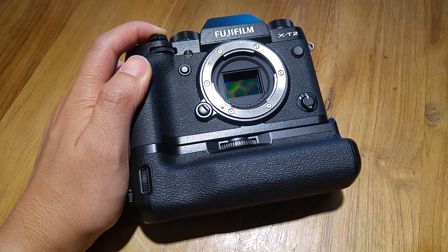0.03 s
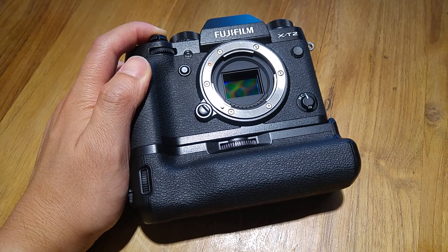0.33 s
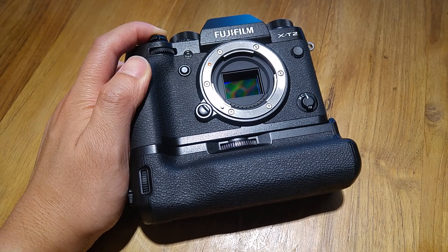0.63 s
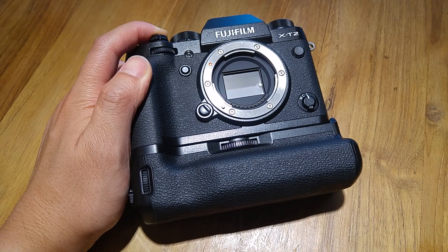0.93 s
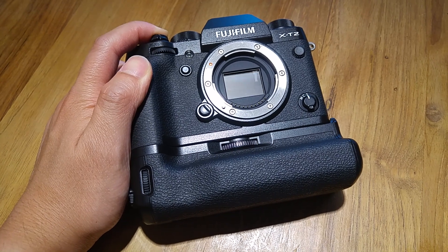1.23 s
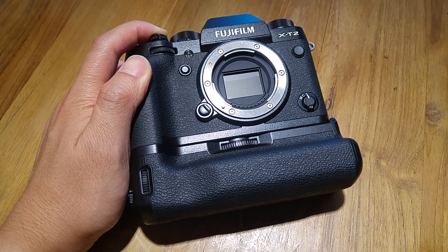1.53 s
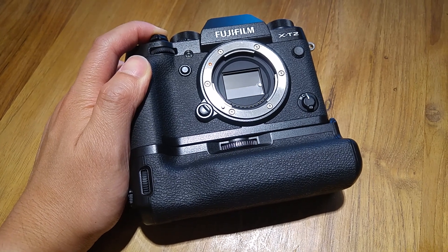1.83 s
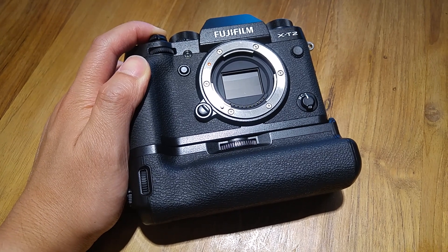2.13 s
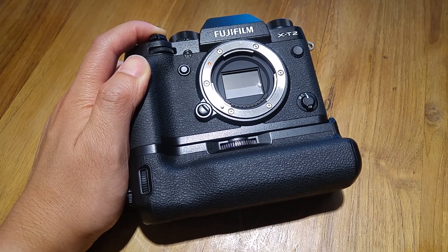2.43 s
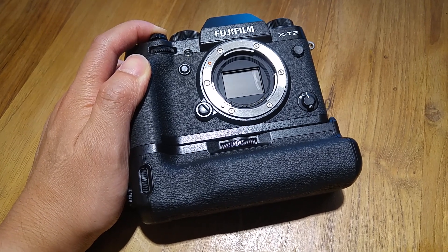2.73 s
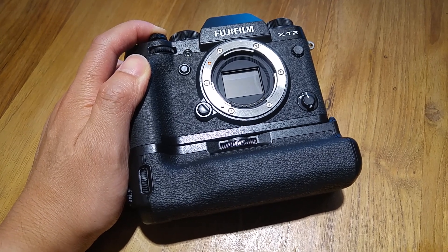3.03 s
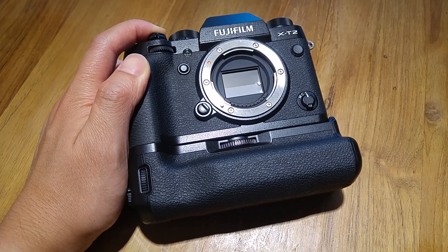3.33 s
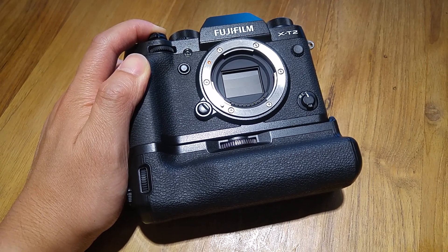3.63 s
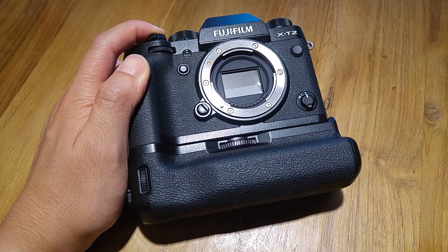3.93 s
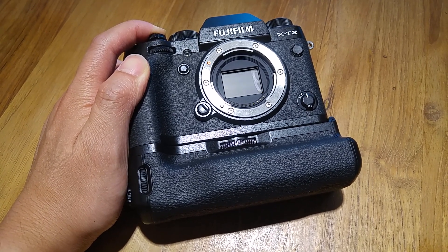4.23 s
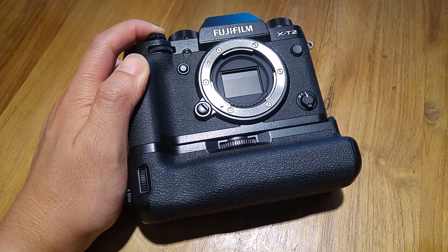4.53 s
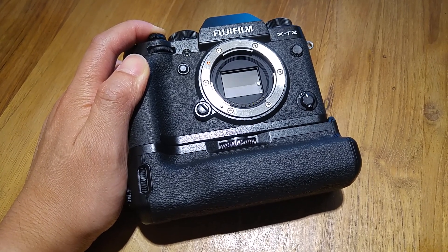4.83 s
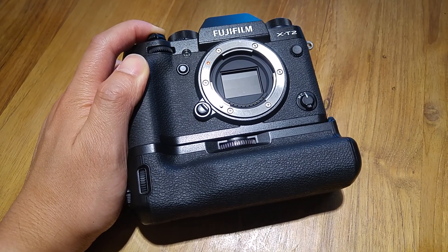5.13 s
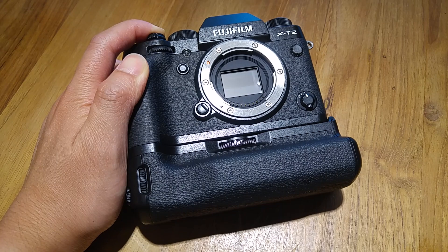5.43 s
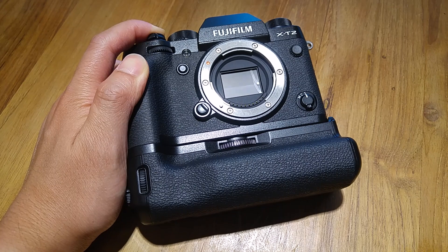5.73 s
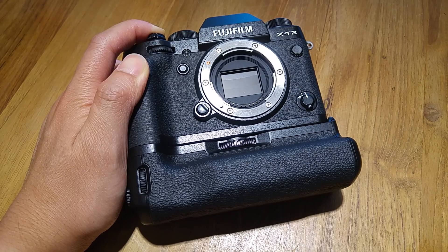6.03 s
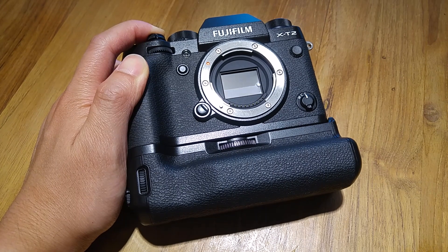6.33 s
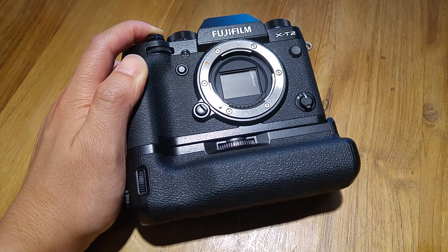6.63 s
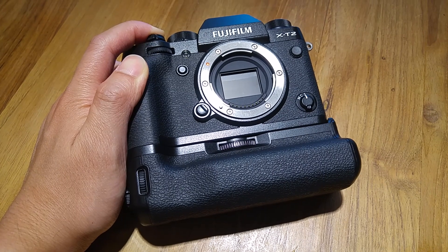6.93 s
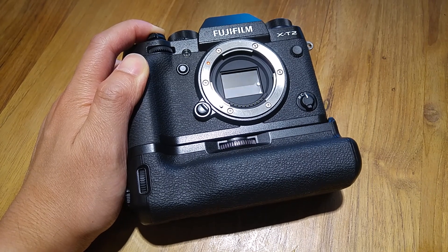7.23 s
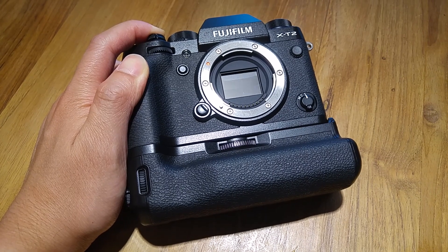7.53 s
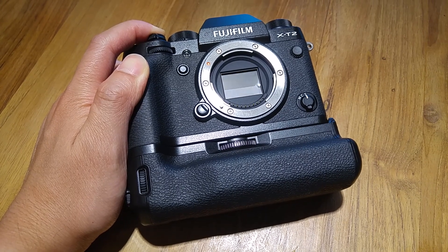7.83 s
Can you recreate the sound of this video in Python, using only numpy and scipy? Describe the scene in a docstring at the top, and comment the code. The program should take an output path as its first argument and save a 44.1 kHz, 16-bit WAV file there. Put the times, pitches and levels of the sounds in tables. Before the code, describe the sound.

A camera held on a wooden table fires continuously, heard close up in stereo in a small room. A short silence and a faint button tick come first, then bright mechanical shutter clicks follow one another in a fast, regular clatter that lasts to the end. Each shot carries tiny latch snaps and a faint rasp of the motor, while soft room reflections and a low table rumble fill the gaps.

```python
"""Camera shutter burst on a wooden table

A mirrorless camera, held on a table in a small room, fires about eleven frames a second close to a stereo
microphone. Each frame repeats one sequence of blows (curtain, latches, levers) and a short run of the
cocking motor. The blows ring the blades, the body and the table; the room fills the gaps."""
import sys
import numpy as np
from scipy import signal
from scipy.fft import rfft, irfft
from scipy.io import wavfile

SR = 44100
rng = np.random.default_rng(int(sys.argv[2]) if len(sys.argv) > 2 else 0)


def wrap_up_sound(samples):
    """Save the sound to the file named by the first command line argument, as 16-bit audio."""
    columns = np.atleast_2d(samples).T
    # keep every value between -1 and 1, then stretch to whole-number steps
    tamed = np.clip(columns, -1, 1)
    steps = np.round(tamed * 32767).astype(np.int16)
    wavfile.write(sys.argv[1], SR, steps)


N = 348390
LEFT_LEAD_S = 0.00011  # the camera's sound reaches the left capsule first
FILTER_HZ = np.fft.rfftfreq(4096, 1 / SR)


def gain_of(db):
    """Decibels to amplitude."""
    return 10 ** (np.asarray(db) / 20)


def unit(x):
    """Scales each row to an energy of 1."""
    return x / np.sqrt(np.sum(x ** 2, -1, keepdims=True) + 1e-20)


def curve_at(points, hz):
    """Reads a curve on a log-frequency axis."""
    point_hz, value = np.transpose(points)
    return np.interp(np.log(hz + 1), np.log(point_hz), value)


def add(mix, start_s, sound):
    """Mixes a stereo sound in at its start time."""
    part = mix[:, max(round(start_s * SR), 0):][:, :sound.shape[-1]]
    part += sound[..., :part.shape[-1]]


def minimum_phase(db):
    """The causal stereo response, of mean energy 1, of spectra given on FILTER_HZ."""
    log_gain = np.log(gain_of(np.concatenate([db, db[..., -2:0:-1]], -1)))
    taps = np.fft.ifft(np.exp(np.conj(signal.hilbert(log_gain)))).real[..., :1024]
    return taps / np.sqrt(np.mean(np.sum(taps ** 2, -1)))


def diffuse_field(samples, alike_hz=900):
    """Noise spectra at two close capsules: alike in the bass, unrelated in the treble."""
    left, other = rfft(rng.standard_normal((2, samples)))
    hz = np.fft.rfftfreq(samples, 1 / SR)
    coherence = 1 / (1 + (hz / alike_hz) ** 2)
    return hz, np.array([left, coherence * left + np.sqrt(1 - coherence ** 2) * other])


def wash(spectrum, level):
    """Noise from all around the microphone, with a given spectrum and level curve."""
    hz, field = diffuse_field(N)
    noise = unit(irfft(field * gain_of(curve_at(spectrum, hz)), N)) * np.sqrt(N)
    return noise * gain_of(np.interp(np.arange(N) / SR, *np.transpose(level)))


# The air of the small room. Each row: frequency in Hz, relative level in dB.
AIR_SPECTRUM = [(18, -46), (30, -20), (167, -4), (240, -3.5), (404, -5), (538, -15), (629, -5.5),
                (1200, -16), (1370, -24), (1690, -21.5), (5300, -33), (7240, -28), (15000, -52)]
# The fade-in of the sound. Each row: time in seconds, level in dB.
AIR_FADE = [(.567, -140), (.570, -60), (.62, -54), (.69, -48.5), (.78, -45)]

def room_tone():
    """Faint background air; the sound fades in from silence just ahead of the shutter button."""
    return wash(AIR_SPECTRUM, AIR_FADE)


# The table top under the camera. Each row: frequency in Hz, relative level in dB.
RUMBLE_SPECTRUM = [(25, -18), (40, -13), (60, -0.5), (88, -15), (118, -2), (180, -2.5), (250, -3.5),
                   (340, -5), (450, -5), (540, -16), (640, -5.5), (1100, -10), (2000, -19), (5000, -60)]
# Its build-up with the first frames. Each row: time in seconds, level in dB.
RUMBLE_SWELL = [(.6, -140), (.8, -64), (.86, -39), (7.9, -39)]

def table_rumble():
    """The shaking table top rumbles for as long as the burst runs."""
    return wash(RUMBLE_SPECTRUM, RUMBLE_SWELL)


# The room's decay. Each row: frequency in Hz, time to fall 60 dB in seconds.
ROOM_DECAY = [(100, 0.4), (800, 0.7), (4000, 0.77), (8000, 0.1), (15000, 0.3)]
# The room from close to the camera. Each row: frequency in Hz, level against the direct sound in dB.
ROOM_LEVEL = [(60, -2), (200, -10), (400, -5), (540, -4.5), (800, -13), (1200, -5), (2000, -8.5),
              (3200, -5.5), (4500, -9), (6000, -10.5), (10000, -9.5), (15000, -18)]

def room_tail(nearest_wall_s=.006):
    """Dense reflections that start after the nearest wall and die fastest in the high treble."""
    _, field = diffuse_field(SR // 2)
    hz, t, bands = signal.stft(irfft(field), SR, nperseg=256)
    t60 = curve_at(ROOM_DECAY, hz)[:, None]
    bands = bands * gain_of(curve_at(ROOM_LEVEL, hz)[:, None] - 60 * t / t60)
    bands *= np.sqrt(2 * np.log(1000) / (t60 * SR))  # a longer decay adds no energy
    tail = np.zeros((2, SR // 2))
    add(tail, nearest_wall_s, signal.istft(bands, SR, nperseg=256)[1])
    return tail


def room_reflections(direct, blend_hz=4.3, tails=3):
    """The room's echo blends among several tails, so repeated clicks ring without a fixed pitch."""
    blend_phase = 2 * np.pi * blend_hz * np.arange(N) / SR
    out = np.zeros((2, N))
    for k in range(tails):
        share = np.abs(np.cos(blend_phase + np.pi * k / tails)) * np.sqrt(2 / tails)
        out += signal.oaconvolve(direct * share, room_tail(), axes=1)[:, :N]
    return out


# The thin metal shutter blades, heard close up. Each row: frequency in Hz, relative level in dB.
BLADE_COLOUR = [(300, -34), (1500, -18.5), (3000, -14.5), (3650, -12), (4300, -9), (5200, -0.5), (6300, -1),
                (7400, -2.5), (9300, -3.5), (10500, -5), (11400, -10.5), (13000, -9.5), (15800, -13.5)]
# Their resonances and notches. Each row: centre in Hz, width in Hz, height in dB.
BLADE_RESONANCES = [(4483, 80, 6.5), (5640, 120, 3), (5987, 190, 5.5), (7100, 80, -2), (7535, 68, 5.5),
                    (7840, 160, -4), (8260, 160, 5.5), (9140, 170, 5.5), (12300, 150, 8), (13300, 150, 1),
                    (14300, 300, 2.5)]
# Their image at the microphone. Each row: frequency in Hz, left over right in dB.
BLADE_IMAGE = [(1500, -3.5), (2800, -10), (4500, -6), (6000, -2), (7500, 2.5), (9800, -2), (12000, 3.5),
               (15000, 4)]

def blade_ring(pitch_hz, tilt_db, bump_db=4, bump_octaves=0.17):
    """The blades' response; the place that is struck favours one region of pitch."""
    octaves = np.log2((FILTER_HZ + 1) / pitch_hz)
    db = curve_at(BLADE_COLOUR, FILTER_HZ) + tilt_db * np.maximum(octaves, -1)
    db += bump_db * np.exp(-(octaves / bump_octaves) ** 2)
    for hz, width, height in BLADE_RESONANCES:
        db += height / (1 + (2 * (FILTER_HZ - hz) / width) ** 2)
    return minimum_phase(db + np.array([[.5], [-.5]]) * curve_at(BLADE_IMAGE, FILTER_HZ))


# One run of the motor inside the camera. Each row: time from the curtain's stop in seconds,
# mean pitch in Hz, whine level in dB, gear rasp level in dB.
MOTOR_RUN = [(.011, 948, -58, -50), (.017, 903, -41, -37), (.021, 842, -31.5, -22.5),
             (.026, 747, -28.5, -39), (.030, 696, -42, -41.5), (.037, 671, -39.5, -30.5),
             (.055, 681.6, -51, -32.5), (.068, 679, -45, -30.5), (.082, 674, -46, -39)]

def cocking_motor(frames, pitch_spread=0.0208):
    """The motor's whine sags as it loads the springs; its gears rasp against the blades."""
    times, *columns = np.transpose(MOTOR_RUN)
    t = np.arange(times[0], times[-1], 1 / SR)
    hz, whine_db, rasp_db = (np.interp(t, times, column) for column in columns)
    whine, rasp = np.zeros((2, 2, N))
    for frame_s, _ in frames:
        speed = 1 + pitch_spread * rng.standard_normal()
        cycles = np.cumsum(hz * speed) / SR - hz * np.array([[0], [LEFT_LEAD_S]])
        add(whine, frame_s + times[0], gain_of(whine_db) * np.sqrt(2) * np.sin(2 * np.pi * cycles))
        add(rasp, frame_s + times[0], gain_of(rasp_db) * rng.standard_normal((2, len(t))))
    return whine + signal.oaconvolve(rasp, blade_ring(pitch_hz=7200, tilt_db=-0.5), axes=1)[:, :N]


# The modes of the wooden table and of the camera's heavier parts. Each row: frequency in Hz,
# time to fall 60 dB in seconds, relative level within the part in dB, left over right in dB.
TABLE_MODES = [(62, 0.14, -8.5, 3), (119.3, 0.11, -0.5, 1), (170, .05, -7, 0), (235, 0.042, 1, 0),
               (350, 0.019, -8.5, 8)]
SHELL_MODES = [(668, 0.041, -13, 1), (799.5, 0.027, 1, 0.76), (893, 0.016, -5.5, 0)]
CHASSIS_MODES = [(1009, 0.014, 1.5, 2), (1156, 0.01, 2, 6), (1364, 0.027, -4, 1)]
LEVER_MODES = [(1714, 0.011, 0.1, 5), (1872, 0.014, -2.4, -9)]
SPRING_MODES = [(2460, 0.0084, 4, -4), (2717, 0.0071, -5, -11.5)]

def part_rings(rise_s=0.00045):
    """Each struck part rings in dying modes; the air follows the part's velocity."""
    t = np.maximum(np.arange(SR // 5) / SR - np.array([[0], [LEFT_LEAD_S]]), 0)
    rings = []
    for modes in (TABLE_MODES, SHELL_MODES, CHASSIS_MODES, LEVER_MODES, SPRING_MODES):
        ring = 0
        for hz, t60, db, side_db in modes:
            bend = gain_of(-60 * t / t60) * np.sin(2 * np.pi * hz * t) * (1 - np.exp(-t / rise_s))
            ring = ring + gain_of(db + np.array([[.5], [-.5]]) * side_db) * unit(np.diff(bend))
        rings.append(ring / np.sqrt(np.mean(np.sum(ring ** 2, -1))))
    return np.array(rings)


def rattle(decay_s, count, repeat_share=0.69, centre_share=0.46, rise_s=0.00019):
    """Tiny contacts, one cluster a blow: a pattern set by the mechanism plus a part new each time."""
    t = np.arange(768) / SR
    fade = np.exp(-t / decay_s) * (1 - np.exp(-t / rise_s))
    noise = rng.standard_normal((count + 1, 3, len(t)))
    sides, centre = noise[:, :2], noise[:, 2:]
    contacts = unit((np.sqrt(centre_share) * centre + np.sqrt(1 - centre_share) * sides) * fade)
    pattern = contacts[0]
    for _ in range(4):  # hard contacts hold all pitches evenly
        flattened = irfft(np.exp(1j * np.angle(rfft(pattern))))
        pattern = unit(flattened * fade ** .2)
    contacts = np.sqrt(repeat_share) * pattern + np.sqrt(1 - repeat_share) * contacts[1:]
    contacts[:, 1] = np.roll(contacts[:, 1], round(LEFT_LEAD_S * SR), -1)
    return contacts


def blows(sequence, frames, jitter_s=.00015, uneven_db=0.73, parts_uneven_db=0.94):
    """Each blow rattles the blades and rings the heavier parts, a little differently in every frame."""
    rings = part_rings()
    out = np.zeros((2, N))
    for delay_s, decay_s, pitch_hz, tilt_db, blades_db, *parts_db in sequence:
        chance = rng.standard_normal((len(frames), 2 + len(rings)))
        knocks = np.tensordot(gain_of(parts_db + parts_uneven_db * chance[:, 2:]), rings, 1)
        contacts = rattle(decay_s, count=len(frames))
        clicks = signal.fftconvolve(contacts, blade_ring(pitch_hz, tilt_db)[None], axes=-1)
        for (frame_s, db), click, knock, (late, hard) in zip(frames, clicks, knocks, chance[:, :2]):
            start_s = frame_s + delay_s + jitter_s * late
            strength = gain_of(db + uneven_db * hard)
            add(out, start_s, strength * gain_of(blades_db) * click)
            add(out, start_s, strength * knock)
    return out


# The button and the first closing, close to the microphone. Each row: start in seconds,
# rattle decay in seconds, blade pitch in Hz, brightness in dB per octave, then the level in dB
# given to the blades, table, shell, chassis, lever and spring.
START_BLOWS = [ (.6280, .0008, 7400, 1, -39, -50, -50, -50, -50, -50),
               (.6330, .0008, 7400, 3, -40, -50, -49.5, -50, -52, -50),
               (.7980, .0020, 5000, -2, -21, -35.5, -26.5, -30, -32, -24),
               (.8072, 0.0026, 8000, 5, -1, -29, -23, -22, -19, -12),
               (.8198, 0.002, 6460, 2.5, 11, -17, -11, -9, -9, 0),
               (.8295, .0014, 6200, -2, 0, -24, -11, -20, -17, -22),
               (.8388, 0.0021, 7000, -2, 2, -21, -4.5, -4, -7, -14), ]

def button_and_first_closing():
    """The button ticks faintly, then the shutter closes ahead of the burst."""
    return blows(START_BLOWS, frames=[(0.00035, 0)])


# The drive's drift off the beat. Each row: time in seconds, lateness in seconds.
DRIVE_DRIFT = [(0.85, -0.0003), (1.027, -0.0015), (1.735, 0.0104), (2.266, 0.0033), (3.151, 0.00031),
               (3.682, 0.0024), (3.947, 0.0002), (5.098, -0.0023), (5.452, 0.0028), (5.894, 0.0016),
               (6.248, 0.007), (6.691, 0.0055), (6.868, 0.0068), (7.399, 0.0046), (7.841, -0.00005)]

def drive_frames(first_s=.85, period_s=.0885, full_db=-0.51, soft_start_db=-1.05, settle_s=.35):
    """Each frame's time and strength: the drive runs a little slow or fast, and starts softer."""
    beat = np.arange(first_s, N / SR, period_s)
    curtain_stop_s = beat + np.interp(beat, *np.transpose(DRIVE_DRIFT))
    strength_db = full_db + soft_start_db * np.exp((first_s - beat) / settle_s)
    return np.column_stack([curtain_stop_s, strength_db])


# One frame, close to the microphone. Each row: start in seconds from the curtain's stop,
# rattle decay in seconds, blade pitch in Hz, brightness in dB per octave, then the relative level
# in dB given to the blades, table, shell, chassis, lever and spring.
FRAME_BLOWS = [ (-.0056, 0.0024, 6060, -2, 3.5, -19.5, -11, -18, -8.5, -10.5),
               (-.0010, 0.0017, 5900, -0.5, 6, -15, -5, -3.5, -4, 1),
               (.0005, 0.00197, 6570, 0.5, 9.5, -14, -6.5, -10, -11.5, -4),
               (.0030, 0.0019, 6400, 0.5, 0.5, -8, -1.5, -12.5, -11.5, -4),
               (.0173, 0.0057, 7200, -0.5, -1, -23, -13.5, -10, -12.5, -14.5),
               (.0390, .0013, 6100, 1.4, 8, -21, -11, -11, -10, -0.5),
               (.0412, 0.0031, 9150, 3, 2, -27, -20, -18, -12.5, -10),
               (.0453, .0015, 7600, -0.2, 6, -14.5, -7.5, -7, -2, -16),
               (.0492, 0.0023, 6660, 0, 1.5, -36, -8.5, -18, -18, -20),
               (.0608, 0.0016, 7600, 1, -12, -28, -18, -29, -19, -26),
               (.0706, 0.0013, 7360, -0.5, -1, -23, -3, -4.5, -6.5, -16), ]

def shutter_burst(frames):
    """In every frame the curtain brakes and slams home, two latches catch and the cocking lever drops."""
    return blows(FRAME_BLOWS, frames)


def scene():
    """The camera up close, with the room, the table's rumble and the air behind it."""
    frames = drive_frames()
    camera = button_and_first_closing() + shutter_burst(frames) + cocking_motor(frames)
    return camera + room_reflections(camera) + table_rumble() + room_tone()


def record(dry, low_cut_hz=46, band_limit_hz=16000):
    """The microphone's low cut; the sharpest peaks clip; then the band limit."""
    thinned = signal.sosfilt(signal.butter(3, low_cut_hz, "high", fs=SR, output="sos"), dry)
    lowpass = signal.firwin(511, band_limit_hz, window=("kaiser", 9), fs=SR)
    return signal.oaconvolve(np.clip(thinned, -1, 1), lowpass[None], "same")


dry = scene()
out = record(dry)
wrap_up_sound(out)
```